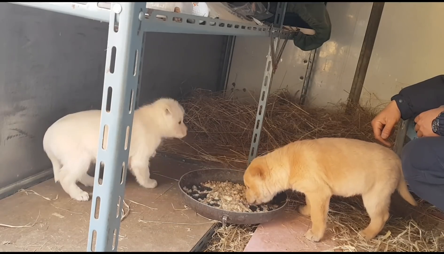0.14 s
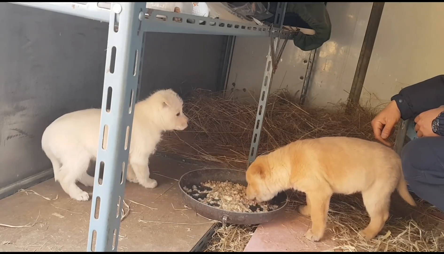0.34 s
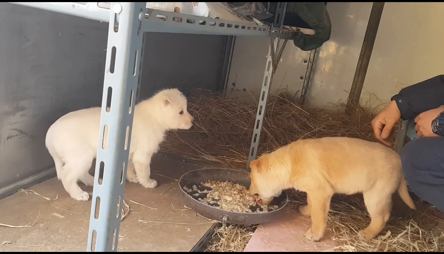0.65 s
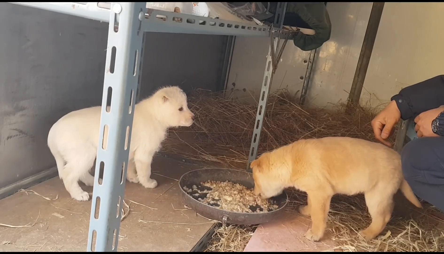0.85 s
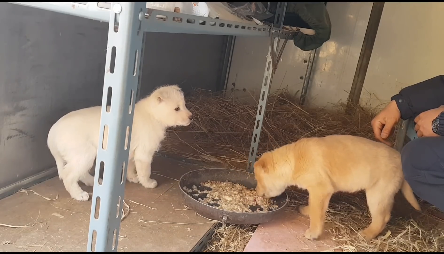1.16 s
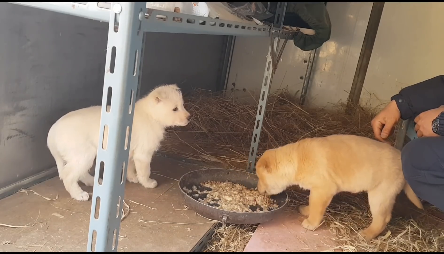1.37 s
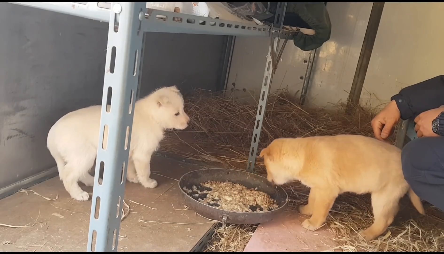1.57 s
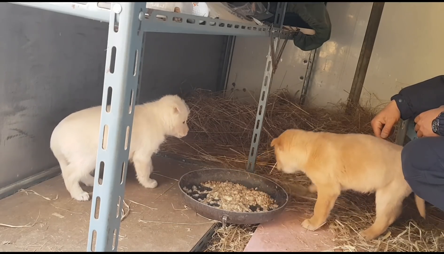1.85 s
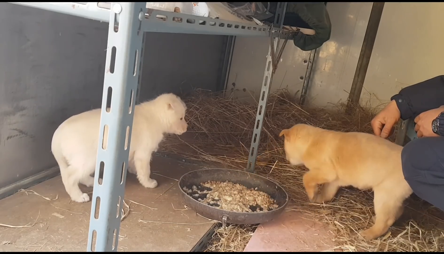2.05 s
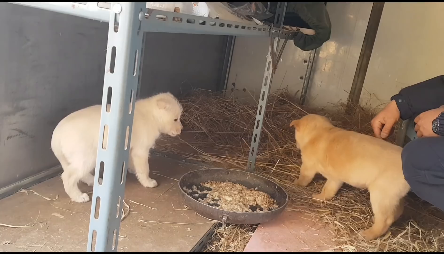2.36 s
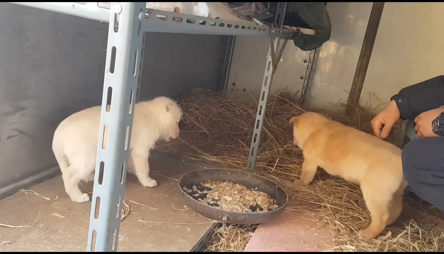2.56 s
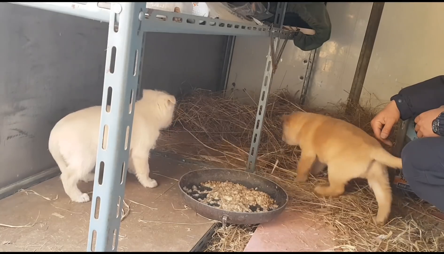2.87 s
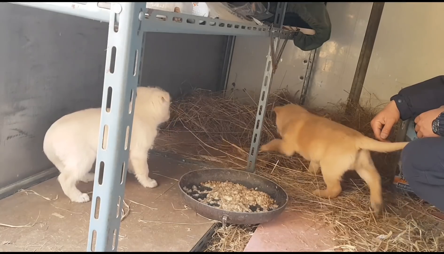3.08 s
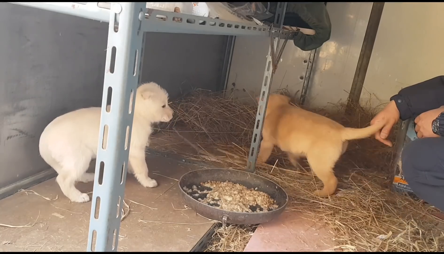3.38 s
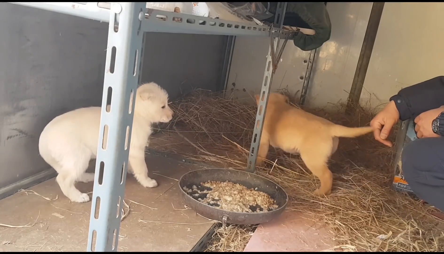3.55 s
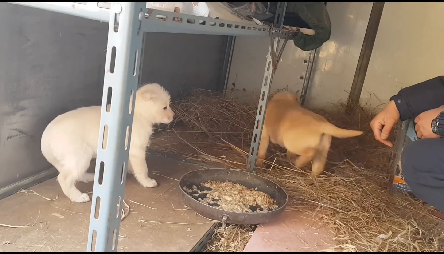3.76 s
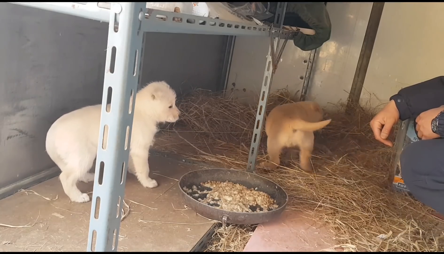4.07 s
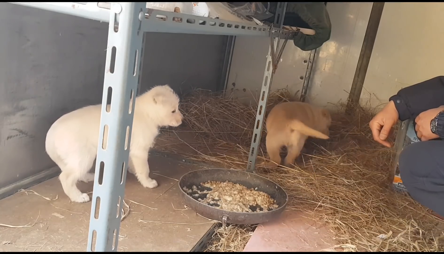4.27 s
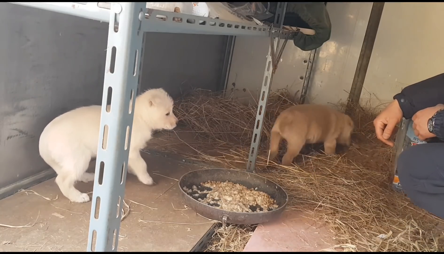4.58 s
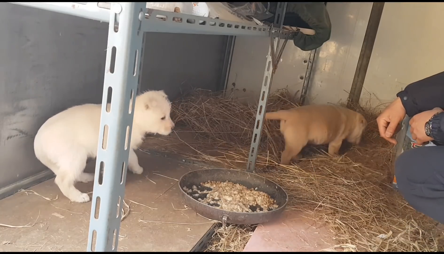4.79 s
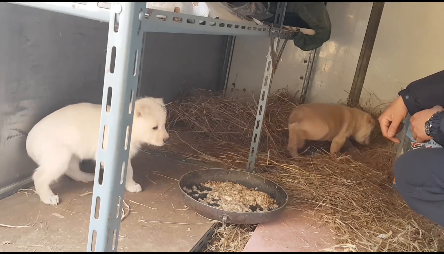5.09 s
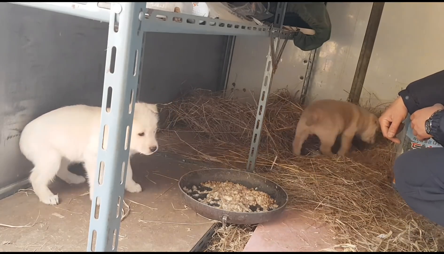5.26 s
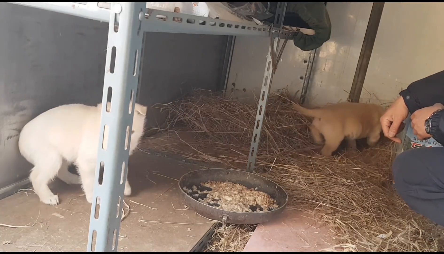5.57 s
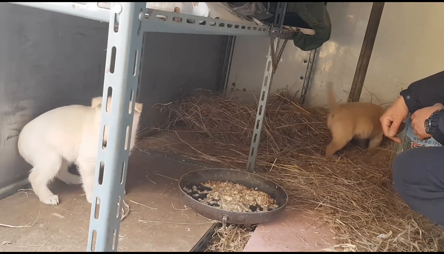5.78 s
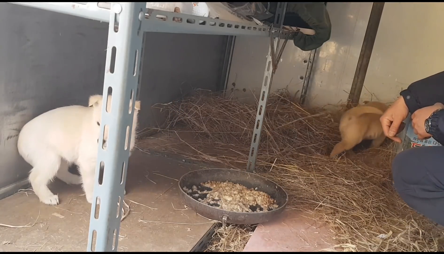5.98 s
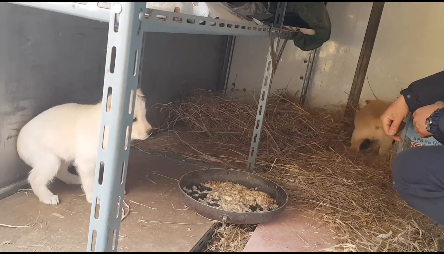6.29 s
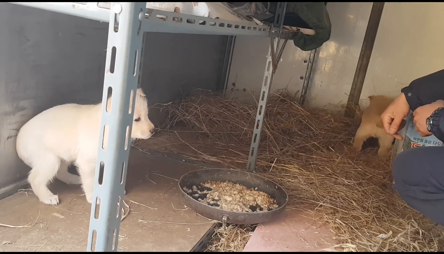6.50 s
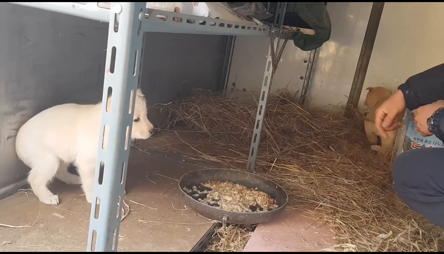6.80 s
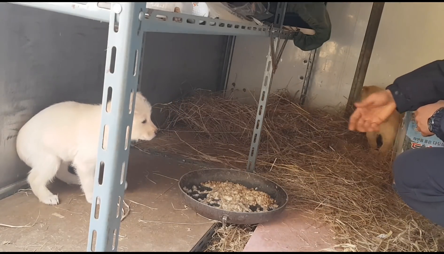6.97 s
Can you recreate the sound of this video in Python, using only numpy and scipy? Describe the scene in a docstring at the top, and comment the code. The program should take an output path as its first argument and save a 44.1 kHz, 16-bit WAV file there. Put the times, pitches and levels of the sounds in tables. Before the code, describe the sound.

Brief gritty scuffs on a hollow floor, then a puppy's paws crunch through dry straw over a faint low drone.

```python
"""In a small, hard-walled shed, a puppy leaves its food pan and walks off over dry straw.
Two scuffs close by drag grit over the hollow floor, and friction sets the boards ringing.
Food clicks faintly. Each step then crushes the bedding in thousands of tiny fractures,
with single stalks snapping and paws thumping softly. The walls add a short reverberation,
and a low outdoor drone lies under it all."""
import sys
import numpy as np
from scipy import signal
from scipy.fft import rfft, irfft, next_fast_len
from scipy.io import wavfile
from scipy.ndimage import uniform_filter1d

SR = 44100
rng = np.random.default_rng(int(sys.argv[2]) if len(sys.argv) > 2 else 0)


def log_audio(samples):
    """Write samples as a 16-bit WAV file to the path given in sys.argv[1]."""
    # one column per channel
    frames = np.atleast_2d(samples).T
    # limit to full scale, then quantise
    limited = np.clip(frames, -1, 1)
    pcm = np.round(limited * 32767).astype(np.int16)
    wavfile.write(sys.argv[1], SR, pcm)


N = 314770
PADDED = next_fast_len(N, True)
HZ = np.fft.rfftfreq(PADDED, 1 / SR)
EDGE_HZ = 15600  # upper limit of the treble


def amp(db):
    """Amplitude grows tenfold with every 20 dB."""
    return 10 ** (np.asarray(db) / 20)


def curve_at(points, hz):
    """Interpolation between (Hz, value) points on a logarithmic frequency axis."""
    f, value = np.transpose(points)
    return np.interp(np.log(hz + 1), np.log(f + 1), value)


def coloured(x, spectrum, band_hz, resonance=1):
    """Source and filter: a spectrum shapes x; the channel mean gets unit rms within band_hz."""
    shaped = rfft(x, PADDED) * resonance * amp(curve_at(spectrum, HZ))
    inside = (HZ > band_hz[0]) & (HZ < band_hz[1])
    band_rms = irfft(shaped.mean(0) * inside, PADDED)[:N].std()
    return irfft(shaped, PADDED)[:, :N] / band_rms


def add(mix, start, sound):
    """Superposition: a sound joins the mix at its start time in seconds."""
    part = mix[:, max(round(start * SR), 0):][:, :sound.shape[1]]
    part += sound[:, :part.shape[1]]


# Likeness of left and right in a diffuse field. Each row: frequency in Hz, correlation.
COHERENCE = [(60, 1), (90, 0.95), (130, 0.69), (250, 0.92), (500, 0.52), (1000, 0.2), (1600, -0.27),
             (3000, 0.098)]
def diffuse(size):
    """Spatial coherence: noise from all sides is alike at two nearby points only for long waves."""
    left, unrelated = rfft(rng.standard_normal((2, size)))
    likeness = np.clip(curve_at(COHERENCE, np.fft.rfftfreq(size, 1 / SR)), -1, 1)
    right = likeness * left + np.sqrt(1 - likeness ** 2) * unrelated
    return irfft(np.array([left, right]), size)


# Reverberation of the shed. Each row: frequency in Hz, time to decay by 60 dB in seconds.
SHED_T60 = [(100, 0.19), (500, 0.25), (2000, 0.32), (5000, 0.19), (15000, .12)]
def shed(x, wet_db):
    """Reverberation: wall reflections follow the direct sound as an exponentially dying tail."""
    hz, t, noise = signal.stft(diffuse(2 ** 13), SR, nperseg=256)
    decay = amp(-60 * t / curve_at(SHED_T60, hz)[:, None])
    response = signal.istft(noise * decay, SR, nperseg=256)[1]
    response *= 1 - np.exp(-np.arange(response.shape[1]) / SR / 0.0014)  # reflections build up
    response *= amp(wet_db) / np.linalg.norm(response[0])
    response[[0, 1], [5, 0]] += 1  # direct sound reaches the left 5 samples after the right
    return signal.oaconvolve(x[None], response, axes=1)


def grains(per_s, spread_db, clump_db, wet_db, spots=5):
    """Shot noise: tiny fractures at several spots, mostly small, a few large, swelling in clumps."""
    out, slots = np.zeros((2, N)), N // 16
    for spot in range(spots):
        chance, size, offset, sign = rng.random((4, slots))
        breaks = chance < per_s / spots * N / SR / slots  # at most one fracture a slot
        clumps = uniform_filter1d(rng.standard_normal(slots), size=34)
        size_db = spread_db * np.minimum(-np.log(1 - size), 5) + clump_db * clumps / clumps.std()
        at = ((np.arange(slots) + offset) * (N // slots)).astype(int)
        clicks = np.zeros(N)
        clicks[at] = amp(size_db) * np.sign(sign - .5) * breaks
        left, right = shed(clicks, wet_db)[:, :N]
        out += [np.roll(left, spot - spots // 2), right]  # each spot has its own bearing
    return out


def swells(rows, shape):
    """Overlapping swells add in power, one envelope per dB column; shape 1 is a cusp, 2 a bell."""
    t, power = np.arange(0, N, 32) / SR, 0
    for peak, press, release, *db in rows:
        away = abs(t - peak) / np.maximum(np.where(t < peak, press, release), 1e-3)
        power = power + amp(db)[:, None] ** 2 * np.exp(-2 * away ** shape)
    return np.array([np.interp(np.arange(N) / SR, t, np.sqrt(p)) for p in power])


# Low boom of the shed and its hollow floor. Each row: frequency in Hz, relative level in dB.
BOOM_SPECTRUM = [(15, -59), (33, -12), (45, -9), (56, 2), (68, 0), (88, -2.5), (118, -15), (160, -26),
                 (400, -30.5), (1000, -47), (3000, -62)]
def boom():
    """Resonance: the shed and its floor favour the bass of diffuse noise."""
    return coloured(diffuse(PADDED), BOOM_SPECTRUM, (30, 130))


def rumble(level_db=-57.5, waver_db=1.4, waver_hz=1.9):
    """Amplitude modulation: an outdoor drone booms in the shed, its level wavering a little."""
    t = np.arange(N) / SR
    rates = np.geomspace(waver_hz / 2, waver_hz * 2, num=8)
    waver = sum(np.sin(2 * np.pi * (hz * t + rng.random())) for hz in rates) / 2
    return amp(level_db + waver_db * waver) * boom()


# Spectra of the grit and the boards. Each row: frequency in Hz, relative level in dB.
GRIT_SPECTRUM = [(500, -2.5), (1300, -0.5), (1900, 0.5), (2500, -1.5), (3700, -1.5), (4350, 4.5),
                 (4800, 0.5), (5400, 1.5), (5750, -2.5), (6500, -0.5), (7300, -5), (7850, 4), (8600, -8.5),
                 (15500, -10)]
BOARD_SPECTRUM = [(70, -28), (220, 0), (500, -4), (750, 1.5), (1200, 1.5), (2000, -33), (4000, -4)]
# Modes of the floor. Each row: frequency in Hz, width in Hz, height over the board spectrum in dB.
FLOOR_MODES = [(252, 12, 13), (386, 15, 24.5), (510, 24, 22), (616, 12.6, 21), (1030, 23, 12),
               (1140, 16, 1), (1291, 9.9, 17), (1310, 14, 11)]
# Overlapping strokes over the floor. Each row: time of full force, press time and release time
# in seconds, then relative levels of grit and boards in dB.
STROKES = [(0.081, 0.081, 0.042, -47.5, -44), (0.157, 0.079, 0.11, -43.5, -41),
           (0.231, 0.034, 0.093, -45, -53.5), (0.339, 0.064, 0.099, -55, -60),
           (0.523, 0.047, 0.09, -47, -51.5)]
def scuffs():
    """Friction: dragged grit hisses and excites the normal modes of the floor boards."""
    mode_power = sum(amp(db) ** 2 / (1 + (2 * (HZ - hz) / width) ** 2) ** 1.22
                     for hz, width, db in FLOOR_MODES)
    jolts = grains(per_s=3000, spread_db=0.5, clump_db=0.5, wet_db=-3.5)
    boards = coloured(jolts, BOARD_SPECTRUM, (200, 1400), resonance=np.sqrt(1 + mode_power))
    scratches = grains(per_s=7000, spread_db=2.5, clump_db=3.0, wet_db=10.5, spots=2)
    grit = coloured(scratches, GRIT_SPECTRUM, (2000, 15000))
    force, shake = swells(STROKES, shape=2.15)
    fizz = signal.sosfilt(signal.butter(2, 8500, "high", fs=SR, output="sos"), grit)
    dull = signal.sosfilt(signal.butter(2, 8500, fs=SR, output="sos"), grit)
    hiss = dull - fizz * force / force.max()  # a lighter stroke is duller
    return amp(-1.7) * hiss * force + amp(0.65) * boards * shake


def knocks(rows, wet_db):
    """Impulse response: each blow excites one heavily damped resonance, then the shed."""
    out, hz = np.zeros((2, N)), np.fft.rfftfreq(4096, 1 / SR)
    for start, db, pitch, octaves in rows:
        log_gain = -1.5 * np.log1p((np.log2((hz + 1) / pitch) / octaves) ** 2)
        mirrored = np.concatenate([log_gain, log_gain[-2:0:-1]])
        minimum_phase = np.exp(np.conj(signal.hilbert(mirrored)))  # no ring before the blow
        sound = shed(np.fft.ifft(minimum_phase).real, wet_db)
        add(out, start, sound * amp(db) / abs(sound.mean(0)).max())
    return out


# Small hard impacts. Each row: start in seconds, relative peak in dB, pitch in Hz, width in octaves.
HARD_IMPACTS = [(0.138, -28.5, 1300, 0.57), (0.158, -37, 1100, 0.86), (0.360, -35, 1500, 1),
                (0.368, -48, 1580, 0.91), (0.803, -48, 4500, 0.34), (0.805, -57, 1800, 0.17),
                (1.045, -71, 700, 0.99), (1.140, -59.5, 4460, .15), (1.275, -47.5, 5000, 0.38),
                (1.335, -58, 1270, .15), (1.522, -60, 1470, 0.14), (3.145, -36, 1900, 0.59),
                (3.178, -39.5, 1450, 0.45), (3.224, -38.5, 2340, 0.79), (4.141, -33.5, 1800, 1),
                (5.417, -37, 1600, 0.46), (6.476, -36.5, 980, 0.94), (7.100, -43, 1010, 0.48),
                (7.122, -40.5, 960, 0.28)]
def taps():
    """Brief contact excites high frequencies: food, grit and thick stalks click."""
    return knocks(HARD_IMPACTS, wet_db=1.5)


# Footfalls. Each row: start in seconds, relative peak in dB, pitch in Hz, width in octaves.
FOOTFALLS = [(0.222, -39, 245, 0.3), (0.232, -42, 109, 0.3), (0.555, -46, 266, 0.33),
             (2.095, -46, 373, 0.17), (2.125, -44, 110, 0.48), (2.255, -58, 93, 0.35),
             (2.56, -45.5, 79.3, 0.5), (2.735, -45, 83, 0.37), (3.325, -49, 124, 0.49),
             (4.245, -43, 64.5, .35), (4.365, -41.5, 70, .35), (4.385, -50.5, 274, 0.4),
             (4.660, -39.5, 74, 0.3), (5.150, -48.5, 350, 0.58), (6.455, -42.5, 62, 0.31)]
def paws():
    """Cushioned contact excites low frequencies: feet and paws thump on the floor."""
    return knocks(FOOTFALLS, wet_db=5)


def patchy_grains(patchy_db, **fractures):
    """Random modulation: patches of level over pitch and time make the crackle uneven in colour."""
    spectra = signal.stft(grains(**fractures), SR, nperseg=256)[2]
    patches = uniform_filter1d(rng.standard_normal(spectra.shape[1:]), size=5, axis=0)  # over pitch
    patches = uniform_filter1d(patches, size=18, axis=1)  # over time
    spectra = spectra * amp(patchy_db * patches / patches.std())
    return signal.istft(spectra, SR, nperseg=256)[1][:, :N]


# Spectra of thin stalks, thick stalks and packed straw. Each row: frequency in Hz, relative level in dB.
CRACKLE_SPECTRUM = [(600, -54), (1500, -24.5), (3200, -6.5), (4500, -3), (6200, -2), (7800, 3), (8700, -4),
                    (10000, -1), (12000, 3), (15500, 0)]
CRUNCH_SPECTRUM = [(350, -19), (800, -15.5), (1350, -0.5), (2300, 0.5), (3300, -1), (5000, -4.5),
                   (9000, -5)]
PUSH_SPECTRUM = [(90, -10), (190, -2.5), (380, -4.5), (560, -1), (800, 0.5), (1100, 1), (1900, -18)]
# Light stirring that grows as the puppy wades in. Each row: time in seconds, relative level in dB.
STIRRING = [(0.65, -70), (0.95, -74.5), (1.1, -70.0), (1.7, -73), (2.0, -56), (2.38, -64.5), (2.45, -64),
            (3.25, -52), (3.38, -56), (3.5, -53.6), (3.86, -58.4), (4.3, -49), (5.0, -55.5), (5.57, -55),
            (6.3, -50), (6.55, -51.5), (7.14, -48.5)]
# Paws pressing into the bedding. Each row: time of full weight, press time and release time
# in seconds, then relative levels of crackle, crunch and push in dB.
PRESSES = [(1.043, 0.014, 0.068, -76, -81, -73.5), (1.182, 0.019, 0.048, -62, -79.0, -81),
           (1.345, 0.044, 0.06, -56.5, -66, -81), (1.469, 0.0073, 0.1, -58.5, -67.5, -89),
           (1.601, 0.037, 0.09, -62.5, -66.5, -80), (1.826, 0.069, 0.062, -53, -69.5, -86.0),
           (1.998, 0.052, 0.134, -48.5, -69.0, -85), (2.07, 0.041, 0.025, -43.5, -45.5, -59.5),
           (2.136, 0.06, 0.042, -42.5, -47, -54.5), (2.315, 0.117, 0.033, -72.0, -70, -96),
           (2.405, 0.0075, 0.092, -50.5, -79, -79.5), (2.464, 0.018, 0.052, -44, -50.5, -72.0),
           (2.627, 0.097, 0.048, -49, -54, -71), (2.717, 0.087, 0.073, -56, -68, -61),
           (2.774, 0.043, 0.016, -44, -58, -71), (2.869, 0.091, 0.051, -48.5, -55, -69),
           (2.938, 0.085, 0.049, -61.5, -57.5, -70.0), (3.061, 0.089, 0.041, -45, -51, -60),
           (3.195, 0.13, 0.097, -55, -57.5, -66.5), (3.527, 0.072, 0.1, -47, -56, -86),
           (3.588, 0.057, 0.12, -59, -57.5, -64.5), (3.737, 0.019, 0.06, -45, -57, -78.5),
           (3.813, 0.019, 0.038, -58.5, -54.5, -59), (3.903, 0.021, 0.059, -45, -55, -59.5),
           (3.952, 0.027, 0.061, -60, -58.5, -63.5), (4.16, 0.076, 0.017, -49.0, -55, -59.5),
           (4.22, 0.037, 0.067, -41.5, -51.5, -58.5), (4.34, 0.042, 0.059, -52, -65, -79.5),
           (4.371, 0.028, 0.084, -43, -49.5, -53), (4.53, 0.098, 0.066, -61.0, -54.5, -62),
           (4.648, 0.025, 0.055, -40.5, -46.5, -53.5), (4.784, 0.077, 0.088, -53.5, -59.0, -60.5),
           (4.87, 0.033, 0.034, -47, -48, -55), (4.92, 0.036, 0.08, -43.5, -47, -52.5),
           (5.131, 0.049, 0.12, -48, -53, -61.5), (5.36, 0.057, 0.035, -64.0, -53.5, -71),
           (5.457, 0.066, 0.059, -46.5, -49.5, -65), (5.659, 0.053, 0.078, -49, -54, -76.5),
           (5.797, 0.028, 0.041, -52.0, -59, -83), (6.034, 0.0093, 0.02, -57, -73, -86.5),
           (6.113, 0.029, 0.13, -51.5, -57.5, -75), (6.284, 0.019, 0.091, -50, -76, -85.0),
           (6.4, 0.032, 0.067, -47, -60.5, -76), (6.484, 0.074, 0.037, -47, -54.5, -58),
           (6.766, 0.084, 0.033, -55, -60, -79.0), (6.926, 0.094, 0.17, -52.5, -62, -71),
           (7.135, 0.12, 0.046, -53, -67, -60)]
def straw():
    """Crushing: thin stalks crackle, thick ones crunch, and the packed layer's push booms in the floor."""
    thin = patchy_grains(patchy_db=2.05, per_s=4000, spread_db=2.5, clump_db=1.0, wet_db=8, spots=6)
    thick = patchy_grains(patchy_db=1.5, per_s=1500, spread_db=4.5, clump_db=4.0, wet_db=4.5, spots=4)
    packed = patchy_grains(patchy_db=3.0, per_s=900, spread_db=1.0, clump_db=2.8, wet_db=3.5, spots=3)
    crackle = amp(-0.06) * coloured(thin, CRACKLE_SPECTRUM, (5000, 15500))
    crunch = amp(0.37) * coloured(thick, CRUNCH_SPECTRUM, (1100, 3000))
    push = amp(-1.5) * coloured(packed, PUSH_SPECTRUM, (280, 900))
    stir = amp(np.interp(np.arange(N) / SR, *np.transpose(STIRRING)))
    reach = amp([[0], [-13], [-25.5]])  # stirring barely reaches the deeper layers
    on_thin, on_thick, on_packed = np.hypot(swells(PRESSES, shape=1.3), stir * reach)
    return crackle * on_thin + crunch * on_thick + (push + amp(2) * boom()) * on_packed


# Single stalks breaking. Each row: start in seconds, relative level in dB, length in seconds,
# lower band edge in Hz.
BREAKS = [(1.027, -68, 0.013, 5000), (1.461, -62, 0.023, 1500), (1.793, -57, 0.03, 3000),
          (2.4, -64, 0.058, 3020), (2.622, -41.5, 0.0062, 10200), (2.626, -40, 0.013, 12200),
          (2.697, -46, 0.015, 3500), (3.725, -52.5, .035, 6000), (3.89, -56.5, 0.035, 3100),
          (4.141, -54, .015, 1190), (4.151, -46, 0.0044, 1500), (4.85, -49, 0.023, 1200),
          (5.033, -45, 0.004, 10000), (6.03, -50, 0.02, 10000)]
def snaps(spread_db=6.0):
    """Brittle fracture: a stalk breaks with one sharp tick and a quickly dying run of splinters."""
    out, t = np.zeros((2, N)), np.arange(SR // 10) / SR
    for start, db, length, low_hz in BREAKS:
        splinters = rng.standard_normal(len(t)) * amp(spread_db * rng.standard_normal(len(t)))
        splinters *= np.exp(-2 * t / length)
        splinters[0] = 4  # the tick
        band = signal.butter(2, [low_hz, EDGE_HZ + 1000], "band", fs=SR, output="sos")
        sound = shed(signal.sosfilt(band, splinters), wet_db=-4)
        rms = np.linalg.norm(sound.mean(0)) / np.sqrt(length * SR)
        add(out, start, sound * amp(db) / rms)
    return out


def scene():
    """Superposition: the pressures of all sources add, a little louder on the left."""
    mix = straw() + scuffs() + snaps() + taps() + paws() + rumble()
    return mix * amp([[.3], [-.3]])


def record(dry):
    """Band limiting: a linear-phase low-pass removes the treble above EDGE_HZ."""
    lowpass = signal.firwin(511, EDGE_HZ, window=("kaiser", 9), fs=SR)
    return signal.oaconvolve(dry, lowpass[None], "same")


dry = scene()
out = record(dry)
log_audio(out)
```